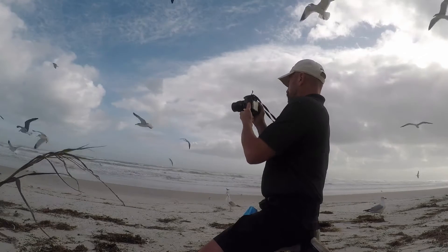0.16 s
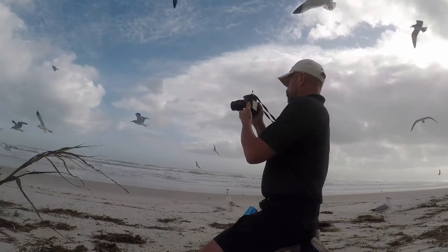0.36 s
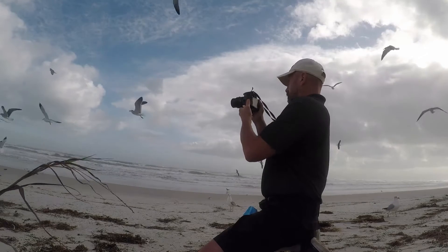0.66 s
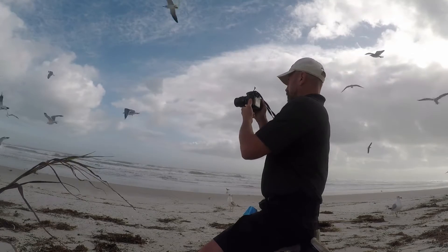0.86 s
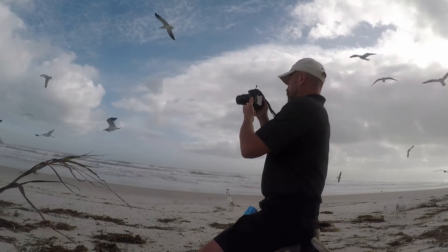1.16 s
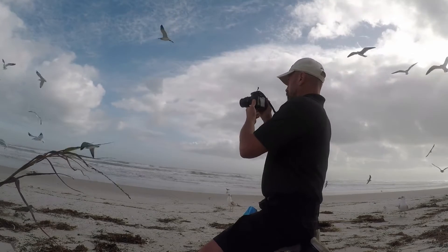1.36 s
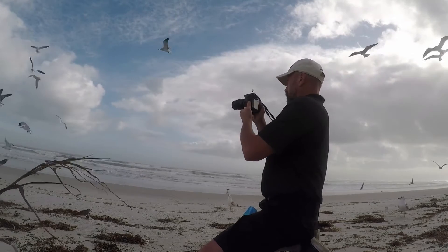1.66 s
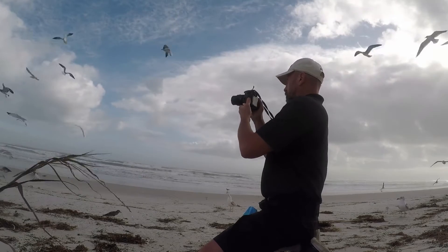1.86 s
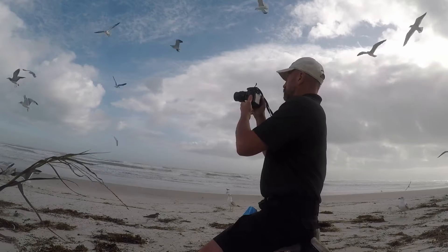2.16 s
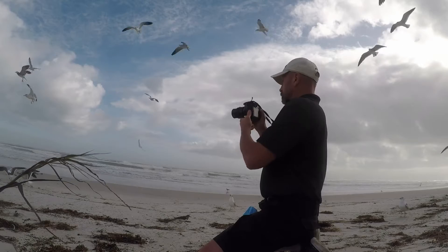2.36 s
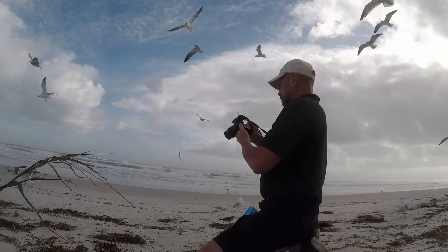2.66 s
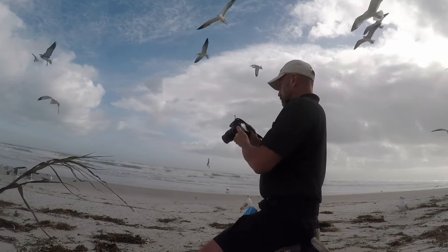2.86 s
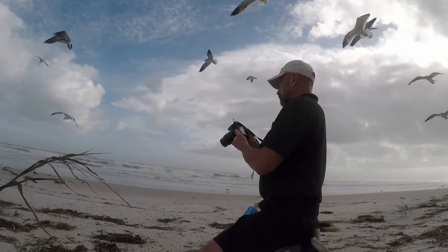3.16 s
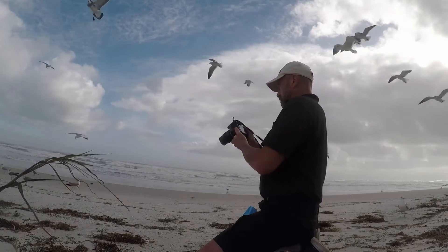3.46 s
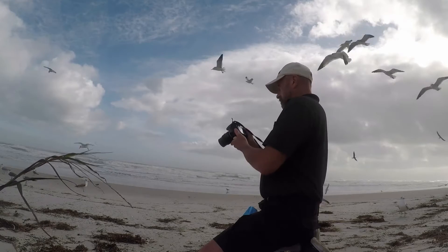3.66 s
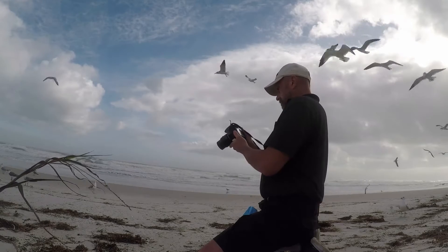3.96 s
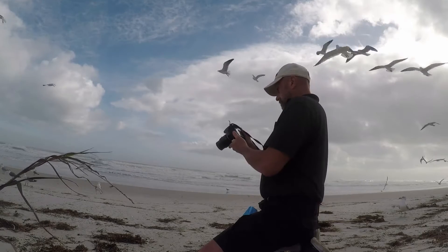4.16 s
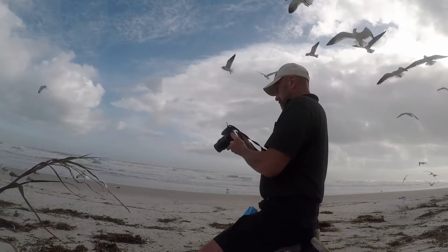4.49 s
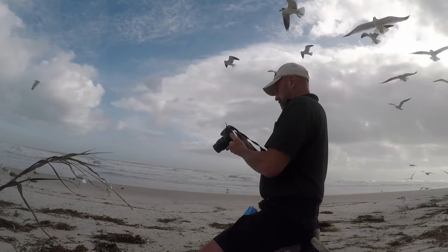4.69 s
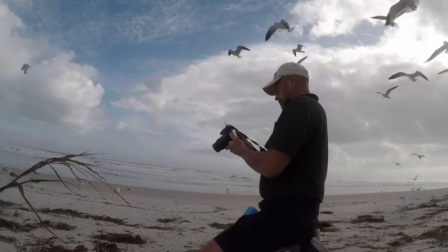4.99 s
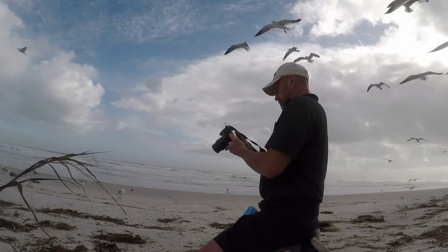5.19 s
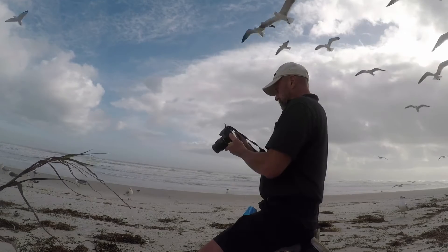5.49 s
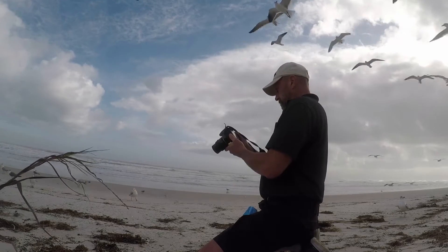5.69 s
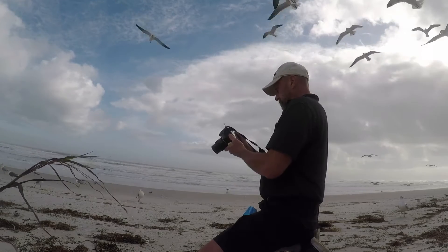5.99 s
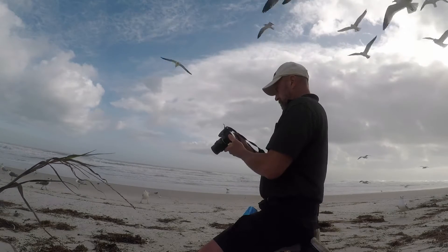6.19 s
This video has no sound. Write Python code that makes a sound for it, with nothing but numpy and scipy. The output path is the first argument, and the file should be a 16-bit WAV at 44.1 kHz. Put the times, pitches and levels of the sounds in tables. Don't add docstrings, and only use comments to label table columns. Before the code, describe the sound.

On an open beach, low wind rumble and hissing surf run throughout. A nearby camera immediately fires a quick, regular burst of about five shots a second, dry clicks with faint motor whirr, stopping near 2.4 seconds. A gull squeals brokenly at 1.4, then a near gull gives three short falling cries, the first answered faintly by a farther bird. Stereo microphones catch uneven wind, with no echo.

```python
import sys
import numpy as np
from scipy import signal
from scipy.fft import rfft, irfft, next_fast_len
from scipy.io import wavfile
from scipy.ndimage import uniform_filter1d

SR = 44100
rng = np.random.default_rng(int(sys.argv[2]) if len(sys.argv) > 2 else 0)


def transcribe(signal):
    frames = np.atleast_2d(signal).T
    limited = np.clip(frames, -1, 1)
    pcm = np.round(limited * 32767).astype(np.int16)
    wavfile.write(sys.argv[1], SR, pcm)


def amplitude_ratio(level_db):
    exponent = np.asarray(level_db, float) / 20
    return 10 ** exponent


N = 279594

# (time [s], wash level [dB])
SWELL = [(0.0, -28.5), (0.42, -28), (1.11, -27.5), (1.34, -29.5), (3.28, -30), (4.34, -28.5), (5.12, -29.5),
         (5.51, -27.5), (6.34, -32.5)]
# (frequency [Hz], density [dB per Hz])
SURF = [(12, -41), (20, -11.5), (96, 1.5), (321, -6.5), (358, -9.5), (411, -10.5), (692, -19),
        (1200, -27.5), (1450, -35.5), (3800, -37), (4740, -41), (5900, -35.5), (8200, -53.5), (13100, -70),
        (14200, -99)]
# (frequency [Hz], likeness [0-1], left-right [dB], left leads [rad])
PORTS = [(30, 0, 5, 1.5), (101, 0.58, 0, -0.5), (296, 0.98, -2, 0.3), (700, 0.67, 0, 0.5),
         (1146, 0.67, 7.5, 1.57), (1550, 0, 4.5, 1), (2640, 0.5, 4.5, -0.5), (4340, 0.66, 4, -0.38),
         (5950, 0.26, 0.1, 2.07), (7900, 0, 2.5, -13), (9300, 0, -9, 10), (14000, 0.06, 2.5, 4)]
RUMBLE_FOLLOWS, SPRAY_FOLLOWS = -.3, 0.14

# (time [s], peak level [dB], low ring [dB])
FRAME = [(.086, -29.5, -6), (.112, -44, 12), (.13, -35, 4), (.1555, -38, -4), (.1675, -39, -2),
         (.1875, -34, 1)]
# (frequency [Hz], level [dB], t60 [s], left-right [dB], left leads [rad])
SHUTTER = [(6600, 0, .011, 5, -.4), (7150, -5, .01, -1, 1.5), (6000, -5, .008, 1, 1.5),
           (7900, -14, .007, -3, 2.4), (9300, -15, .006, -7, 2.4), (10800, -21, .005, -4, .5),
           (12600, -23, .005, -4, .5)]
LOW_RING = (4100, -3, .02, 2, -.3)
FRAME_S, FRAMES, WHIRR_DB = .19675, 12, -62
CRACK_DB, CRACK_S, CRACK_HZ = -5, .0009, [5200, 9500]

# (start [s], crest [s], end [s], crest pitch [Hz], end pitch [Hz])
CRIES = [
    (1.977, 2.104, 2.247, 2632, 2120),
    (3.253, 3.35, 3.575, 2617, 2268),
    (4.6, 4.744, 4.88, 2565, 2087),
]
# (attack [s], scoop, overshoot, dip [shares under the crest],
# fundamental's loss at the crest [dB])
ENTRIES = [(0.012, .025, -.001, .03, -5.5), (.013, 0.0031, .009, .021, 0), (.019, .07, .004, .027, 5)]
STRAIN_DB = [-2.5, 0.5, 1]
# (multiple, level column, added level [dB], left-right [dB], left leads [rad])
CRY = [(1, 0, 0, -5.5, .3), (2, 1, 0, .5, -1.4), (3, 2, 0, -2.5, -2.2), (4, 3, -21, 4, 2.6),
       (5, 2, -34, -7, .5)]
FAR = [(1, 0, 0, -9, .3), (2, 1, 0, -7, -0.93)]
CRY_DB, EFFORT_DIP_DB, EFFORT_FALL_DB = (-24, -23.5, -33), -3, -22
RISE_S, CRY_RELEASE_S, CRY_EDGE_DB = .014, .03, -16
DIP_AT = .38
SHOULDER, SHOULDER_SAG, SHOULDER_EFFORT = 0.22, 0.15, 0.23
FIRST_FADE_DB, THIRD_FOLLOWS = -15.5, 0.64
FOURTH_LOSS = 2.5
THIRD_END_DB, WAVER = -14, .002
FOLD_HZ, FOLD_DB = 24000, -33

# (start [s], end [s], first pitch [Hz], last pitch [Hz], lead level [dB])
CATCHES = [(1.966, 1.989, 2040, 2150, -43), (3.239, 3.27, 1993, 2080, -43)]
FAR_CRIES = [(2.445, 2.529, 2395, 2280, -42.5), (2.521, 2.618, 2060, 2005, -53)]
FAR_SECOND_DB = 1, 7
NOTES = [
    (1.426, 1.472, 2758, 2796, -25),
    (1.459, 1.504, 3620, 3790, -23.5),
    (1.5, 1.596, 6064, 6150, -22),
    (1.585, 1.631, 6290, 6250, -42),
    (1.573, 1.642, 4960, 5070, -34),
    (1.624, 1.686, 3700, 3420, -31),
    (1.686, 1.865, 3480, 3406, -35),
    (1.764, 1.857, 3470, 3380, -46),
]
# (scoop share, droop share, swell [dB], other partials first [dB], other partials last [dB])
GESTURES = [(0.045, .015, 7, -8.5, 1), (0.024, 0.0058, -7, -2, -13), (-0.015, -0.03, -7, -40, -30),
            (-0.001, .05, -3, 5, -3), (.04, .06, -2, -8, -5.5), (-0.038, .006, 1.5, -30, -20),
            (0.032, 0.043, -10, -19, -26), (0, .02, -4, 0, 0)]
# (multiple, level column, added level [dB], left-right [dB], left leads [rad])
CROAK = [(1, 0, 0, 14, .1), (2, 1, 0, 1.5, 1.5), (.76, 1, -13, 6, 0), (1.24, 1, -9, 13, 0),
         (1.78, 1, -7, .5, 1.2), (2.25, 1, -12, 3, 2.2), (2.44, 1, -14, 2, 2.2), (2.78, 1, -24, -3, 2),
         (3, 1, -31, .5, 2)]
BREAK = [(1, 0, 0, 15, -1.5), (1.5, 1, 0, 1.5, 1.5), (1.97, 1, -12, 2.5, 2.2), (1.72, 1, -14, -1.5, 2.5)]
WHISTLE = [(1, 0, 0, 1.2, 2.1), (.986, 1, 0, 1.2, 2.1), (1.014, 1, 0, 1.2, 2.1)]
RASP = [(1, 0, 0, 4, 1.2), (.769, 1, 0, 12, 0), (1.77, 1, -20, 0, 2), (2, 1, -25, 0, 2)]
WAIL = [(1, 0, 0, 14, .6), (2, 1, 0, 3, 2.1)]
SPLIT = [(5 / 7, 0, 0, 9, 0), (6 / 7, 0, -6, 5, 0), (8 / 7, 0, 2, 7, 0), (9 / 7, 0, -2, 3, .5),
         (10 / 7, 0, -5, 3, .5)]
REGISTERS = [(CROAK, .26), (BREAK, .24), (WHISTLE, .04), (WHISTLE, .1), (RASP, .4), (WAIL, .1), (WAIL, .12),
             (SPLIT, .4)]
NOTE_ATTACK_S, NOTE_RELEASE_S, NOTE_EDGE_DB = .01, 0.013, -10
SCOOP_SHARE, DROOP_SHARE = .22, .18

# (frequency [Hz], threshold over the usual line height [dB])
DROPPED = [(4000, -24), (6500, -19), (7600, -9), (8300, -2), (9600, 1), (11500, 4), (13000, 6), (13500, 9),
           (13800, 17), (14050, 22), (14150, 60)]


def rms_one(x):
    return x / np.sqrt(np.mean(x ** 2) + 1e-20)


def over_hz(points, hz):
    at, *columns = np.transpose(points)
    return [np.interp(np.log(hz), np.log(at), c) for c in columns]


def drift(rate, size=N):
    r = np.exp(-16 * np.pi * rate / SR)
    noise = rng.standard_normal(size // 8 + 4002)
    slow = signal.lfilter([1], [1, -2 * r, r * r], noise)[4000:]
    return np.interp(np.arange(size) / 8, np.arange(len(slow)), rms_one(slow))


def surf(patchy_db):
    size = next_fast_len(N)
    hz = np.maximum(np.arange(size // 2 + 1) * SR / size, 1)
    alike, pan_db, lead = over_hz(PORTS, hz)
    alike = np.clip(alike, 0, 1)
    shared, left, right = rfft(rng.standard_normal((3, size)))
    common = np.sqrt(alike) * shared * np.exp([[.5j], [-.5j]] * lead)
    pair = common + np.sqrt(1 - alike) * np.array([left, right])
    pair = pair * amplitude_ratio(over_hz(SURF, hz)[0] + pan_db * [[.5], [-.5]])

    s, wash_db = np.transpose(SWELL)
    swing_db = np.interp(np.arange(N) / SR, s, wash_db - wash_db.mean())
    swell_db = np.outer([RUMBLE_FOLLOWS, 1, SPRAY_FOLLOWS], swing_db)
    out, step = 0, 2 * np.log2(hz / 20)
    for k in range(20):
        distance = np.clip(np.clip(step, 0, 19) - k, -1, 1)
        share = np.cos(np.pi / 2 * distance) ** 2
        place = np.interp(k, [5, 11, 15], [0, 1, 2])
        mix = np.clip(1 - abs(place - np.arange(3)), 0, 1)
        band_db = mix @ swell_db + patchy_db * drift(5.3)
        out = out + irfft(pair * share, size)[:, :N] * amplitude_ratio(band_db)
    return rms_one(out)


def ring(clicks, hz, t60):
    r, w = amplitude_ratio(-60 / (t60 * SR)), 2 * np.pi * hz / SR
    return signal.lfilter([0, np.sin(w)], [1, -2 * r * np.cos(w), r * r], clicks + 1e-18)


def shutter_ring(at, peak_db, low_db):
    out = np.zeros((2, N))
    for k, (hz, db, t60, pan_db, lead) in enumerate(SHUTTER + [LOW_RING]):
        is_low = k == len(SHUTTER)
        clicks = np.zeros(N)
        clicks[at] = amplitude_ratio(peak_db + 1.5 + db + low_db * is_low + 2.5 * rng.standard_normal(len(at)))
        rung = ring(ring(clicks, hz, t60), hz, .003) * 6 * np.log(10) / (.003 * SR)
        lag = round(lead * SR / (2 * np.pi * hz))
        out += [amplitude_ratio(pan_db / 2) * rung, amplitude_ratio(-pan_db / 2) * np.roll(rung, lag)]
    return out


def contact_crack(at, peak_db):
    clicks = np.zeros(N)
    clicks[at] = amplitude_ratio(peak_db + CRACK_DB) * CRACK_S * SR
    decay = np.exp(-1 / (CRACK_S * SR))
    envelope = signal.lfilter([1 / (CRACK_S * SR)], [1, -decay], clicks + 1e-18)
    puffs = envelope * rng.standard_normal((2, N))
    return signal.sosfilt(signal.butter(2, CRACK_HZ, "band", fs=SR, output="sos"), puffs)


def motor_whirr(first_s, last_s):
    t = np.arange(N) / SR
    working = (t - first_s) % FRAME_S < .115
    running = uniform_filter1d((.5 + .5 * working) * (t < last_s + .02), size=600)
    band = signal.butter(3, [7500, 13300], "band", fs=SR, output="sos")
    whirr = signal.sosfilt(band, rng.standard_normal((2, N)))
    return amplitude_ratio(WHIRR_DB) * running * rms_one(whirr)


def camera():
    s, peak_db, low_db = np.tile(np.transpose(FRAME), FRAMES)
    s = s + FRAME_S * np.repeat(np.arange(FRAMES), len(FRAME))
    at = np.round(s * SR).astype(int)
    return shutter_ring(at, peak_db, low_db) + contact_crack(at, peak_db) + motor_whirr(s[0], s[-1])


def voice(curve, partials, hoarse, fold_db=-120):
    s, pitch_hz, *levels = np.transpose(curve)
    start, size = round(s[0] * SR), round((s[-1] - s[0]) * SR)
    t = s[0] + np.arange(size) / SR
    smooth_hz = uniform_filter1d(np.interp(t, s, pitch_hz), size=400)
    turn = 2 * np.pi * np.cumsum(smooth_hz * (1 + WAVER * drift(25.0, size))) / SR
    fade = np.clip(np.minimum(t - s[0], s[-1] - t) / 0.0067, 0, 1)
    out = np.zeros((2, N))
    for multiple, column, db, pan_db, lead in partials:
        ports = amplitude_ratio([pan_db / 2, -pan_db / 2]) * np.exp(np.array([.5j, -.5j]) * lead)
        ports = ports / abs(ports.mean())
        shake = 1 + hoarse * (drift(250.0, size) + 1j * drift(250.0, size))
        height = amplitude_ratio(np.interp(t, s, levels[column]) + db + 3.5)
        tone = height * shake * np.exp(1j * (multiple * turn + 7 * rng.random()))
        out[:, start:start + size] += fade * np.real(ports[:, None] * tone)
    fold = amplitude_ratio(np.interp(t, s, levels[-1]) + fold_db) * np.sin(2 * np.pi * FOLD_HZ * t - 4 * turn)
    out[:, start:start + size] += fade * fold
    return out


def note(row, scoop, droop, swell_db, other_first_db, other_last_db):
    start, end, first_hz, last_hz, db = row
    part = np.linspace(0, 1, num=40)
    s = start + part * (end - start)
    pitch_hz = np.interp(part, [0, SCOOP_SHARE, 1 - DROOP_SHARE, 1],
                         [first_hz * (1 - scoop), first_hz, last_hz, last_hz * (1 - droop)])
    edge = np.interp(s, [start, start + NOTE_ATTACK_S, end - NOTE_RELEASE_S, end], [1, 0, 0, 1])
    lead_db = db + swell_db * (part - .5) + NOTE_EDGE_DB * edge
    other_db = lead_db + other_first_db + part * (other_last_db - other_first_db)
    return np.transpose([s, pitch_hz, lead_db, other_db])


def cry(start, crest, end, crest_hz, end_hz, attack, scoop, overshoot, dip, crest_loss_db, strain_db):
    dip_s = start + DIP_AT * (crest - start)
    shoulder_s = crest + SHOULDER * (end - crest)
    s = np.linspace(start, end, num=80)
    sag = 1 - end_hz / crest_hz
    under = np.interp(s, [start, start + attack, dip_s, crest, shoulder_s, end],
                      [scoop, overshoot, dip, 0, SHOULDER_SAG * sag, sag])
    edge_db = CRY_EDGE_DB * np.interp(s, [start, start + RISE_S, end - CRY_RELEASE_S, end], [1, 0, 0, 1])
    effort_db = strain_db + np.interp(s, [start + attack, dip_s, crest, shoulder_s, end],
                                      [0, EFFORT_DIP_DB, 0, SHOULDER_EFFORT * EFFORT_FALL_DB, EFFORT_FALL_DB])
    crest_loss = crest_loss_db * np.interp(s, [dip_s, crest, shoulder_s], [0, 1, 0])
    first_db = FIRST_FADE_DB * (s - start) / (end - start) + crest_loss
    thinning = np.clip((s - crest) / (end - crest), 0, 1) ** 4.6
    third_db = THIRD_FOLLOWS * effort_db + THIRD_END_DB * thinning
    fourth_db = third_db + FOURTH_LOSS * min(crest_loss_db, 0) * np.interp(s, [dip_s, crest], [0, 1])
    levels = zip([*CRY_DB, CRY_DB[-1]], (first_db, effort_db, third_db, fourth_db))
    return np.transpose([s, crest_hz * (1 - under)] + [db + d + edge_db for db, d in levels])


def gulls():
    far = sum(voice(note(row, 0.072, .015, -4, db, db), FAR, 0.18)
              for row, db in zip(FAR_CRIES, FAR_SECOND_DB))
    squeal = sum(voice(note(row, *shape), *register)
                 for row, shape, register in zip(NOTES, GESTURES, REGISTERS))
    catches = sum(voice(note(row, 0, -.13, -3, 8, 7), FAR, .5) for row in CATCHES)
    near = sum(voice(cry(*row, *entry, db), CRY, .04, fold_db=FOLD_DB)
               for row, entry, db in zip(CRIES, ENTRIES, STRAIN_DB))
    return near + catches + far + squeal


def scene():
    return amplitude_ratio(-13.5) * surf(patchy_db=0.42) + camera() + gulls()


def thin_treble(x, calm_db, slope, scatter_db):
    hop, lead_in = 1024, 1024 - 416
    n, k = np.arange(2 * hop), np.arange(hop)[:, None]
    window = np.sin(np.pi * (n + .5) / (2 * hop))
    basis = np.sqrt(2 / hop) * window * np.cos(np.pi / hop * (n + .5 + hop / 2) * (k + .5))
    padding = ((0, 0), (lead_in + hop, 2 * hop - (N + lead_in) % hop))
    blocks = np.pad([x[0] + x[1], x[0] - x[1]], padding).reshape(2, -1, hop) / 2
    lines = np.concatenate([blocks[:, :-1], blocks[:, 1:]], axis=2) @ basis.T

    hz = (k[:, 0] + .5) * SR / (2 * hop)
    usual = uniform_filter1d(np.median(abs(lines), axis=1, keepdims=True), size=24)
    cry_band = (hz > 4500) & (hz < 7900)
    loud_db = 20 * np.log10(abs(lines[:, :, cry_band]).max(axis=(0, 2)))
    reach = np.interp(hz, [7900, 8000, 12200, 12700], [0, 1, 1, .5])
    masking_db = slope * np.clip(loud_db - calm_db, 0, 19)[:, None] * reach
    chance = rng.standard_normal((lines.shape[1], hop // 16))
    chance_db = scatter_db * np.repeat(chance, 16, axis=1)
    threshold = usual * amplitude_ratio(over_hz(DROPPED, hz)[0] + masking_db + chance_db)

    frames = (lines * (abs(lines) > threshold)) @ basis
    lapped = frames[:, 1:, :hop] + frames[:, :-1, hop:]
    mid, side = lapped.reshape(2, -1)[:, lead_in:lead_in + N]
    return np.array([mid + side, mid - side])


def low_pass(x):
    return signal.sosfilt(signal.butter(12, 14360, fs=SR, output="sos"), x)


def record(dry):
    rounded = 1.8 * np.tanh(dry / 1.8)
    thinned = thin_treble(rounded, calm_db=-22, slope=1, scatter_db=7)
    return low_pass(thinned)


dry = scene()
out = record(dry)
transcribe(out)
```